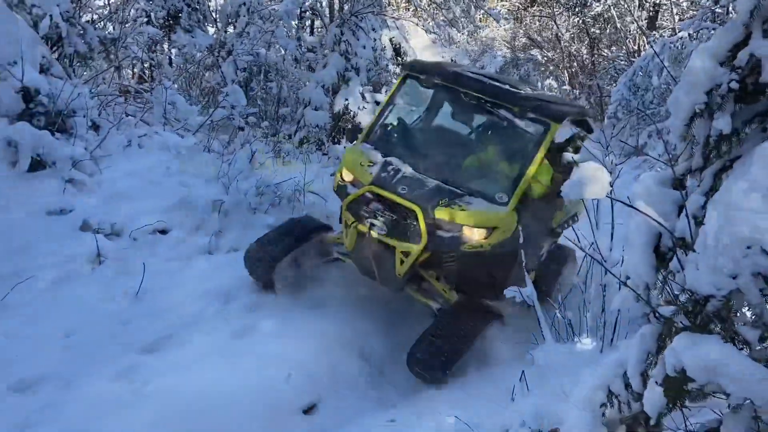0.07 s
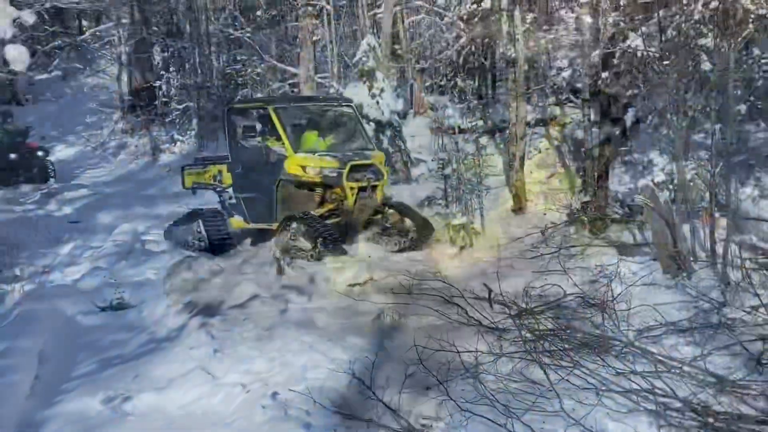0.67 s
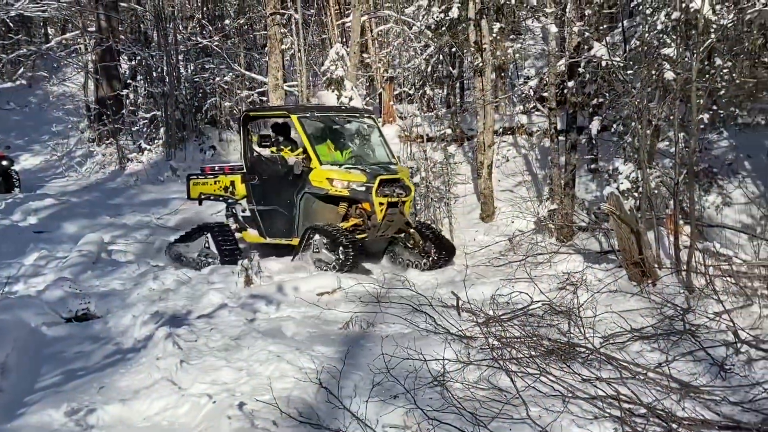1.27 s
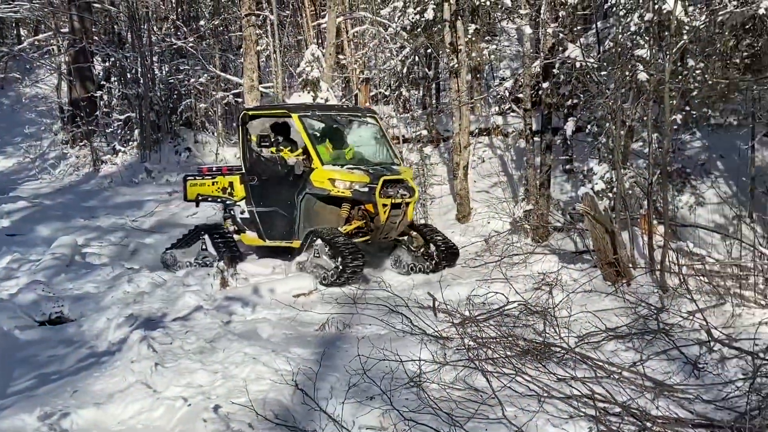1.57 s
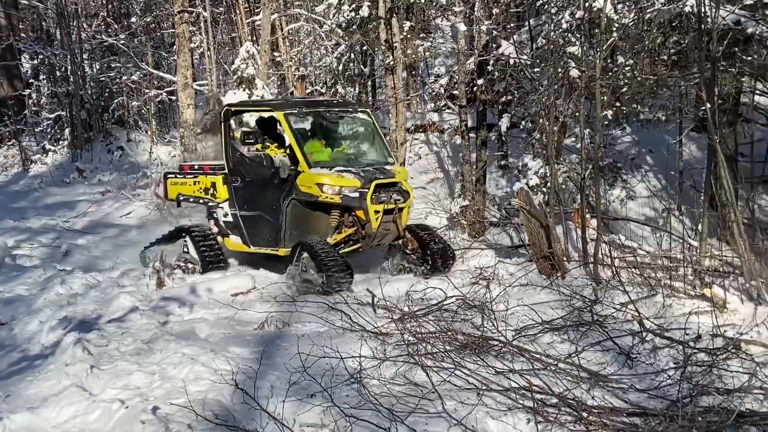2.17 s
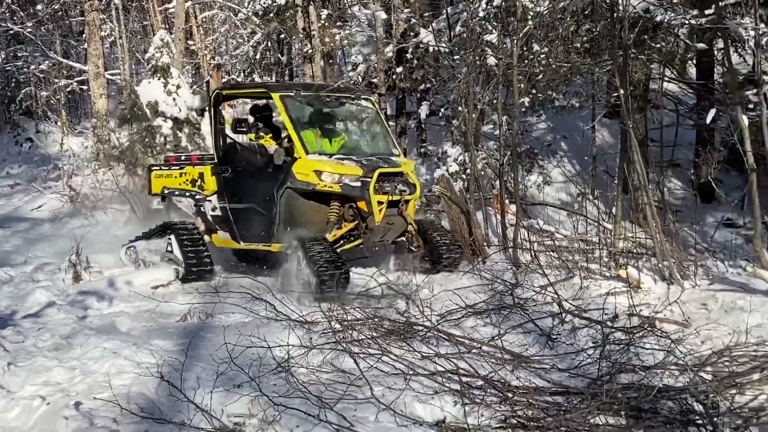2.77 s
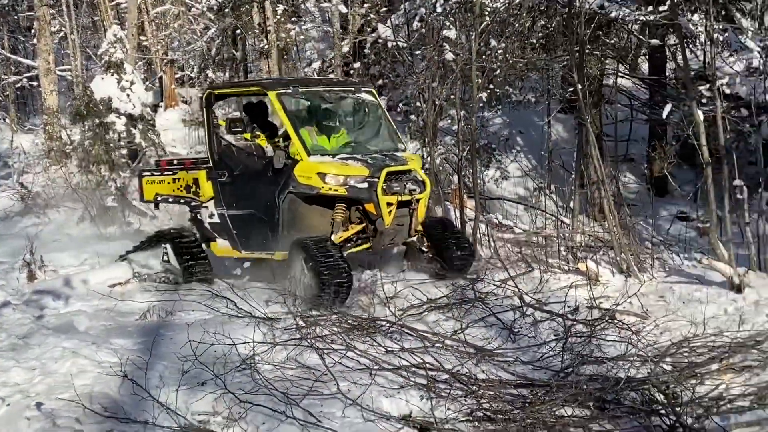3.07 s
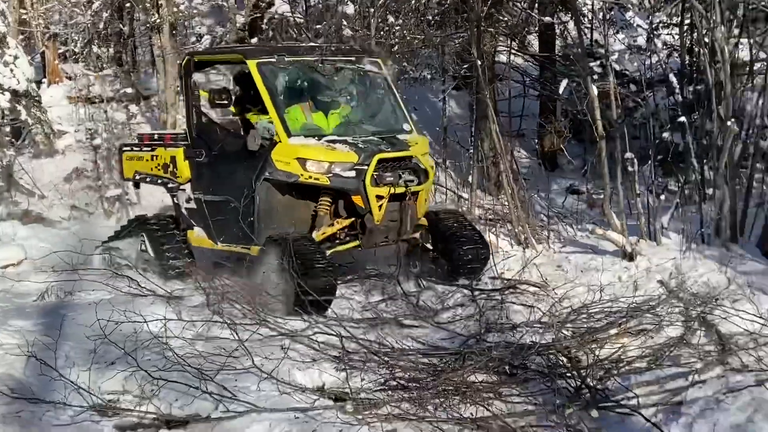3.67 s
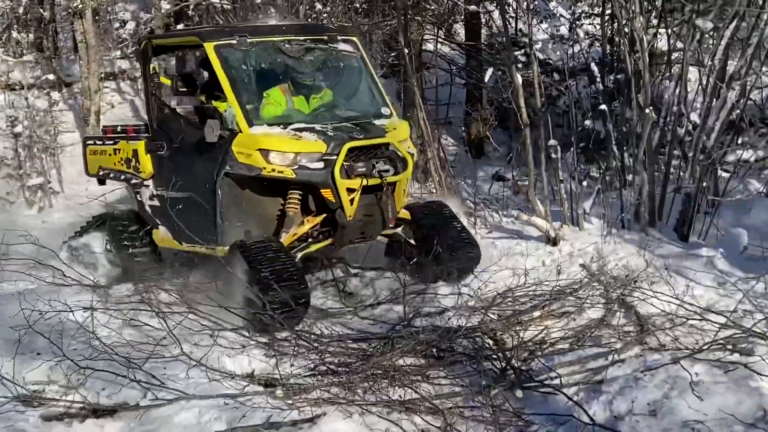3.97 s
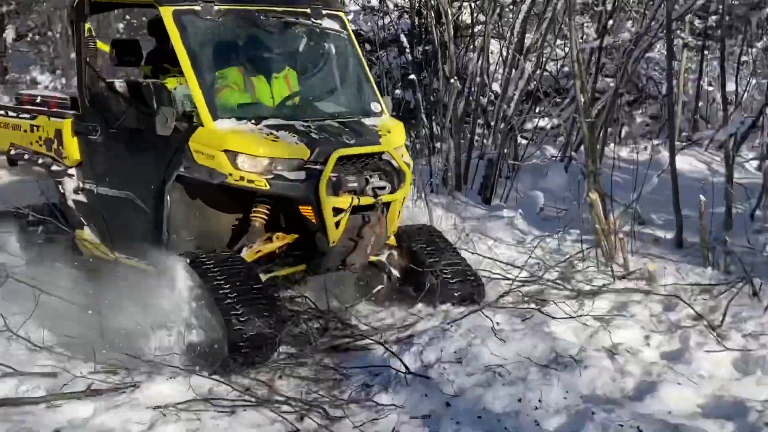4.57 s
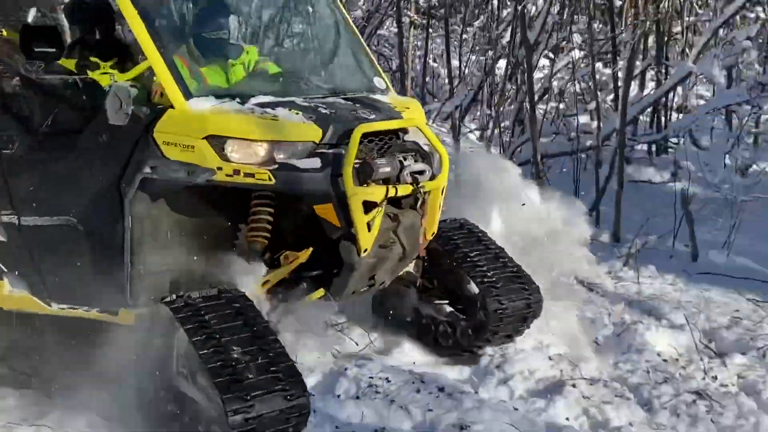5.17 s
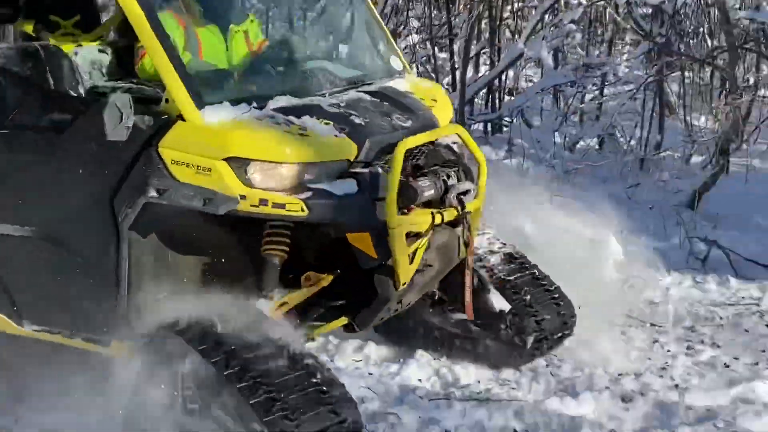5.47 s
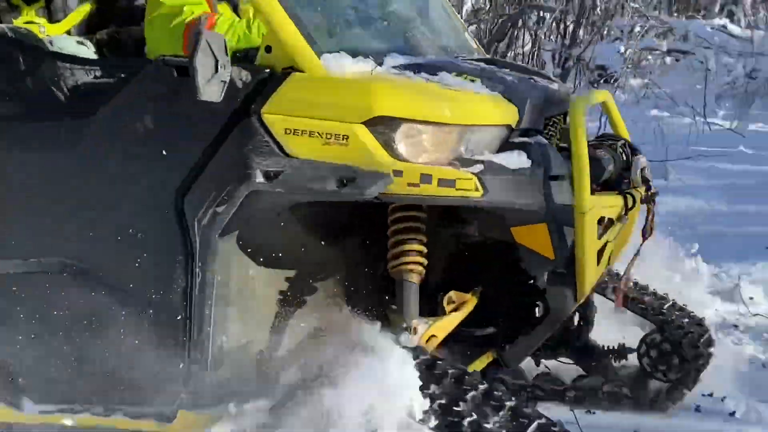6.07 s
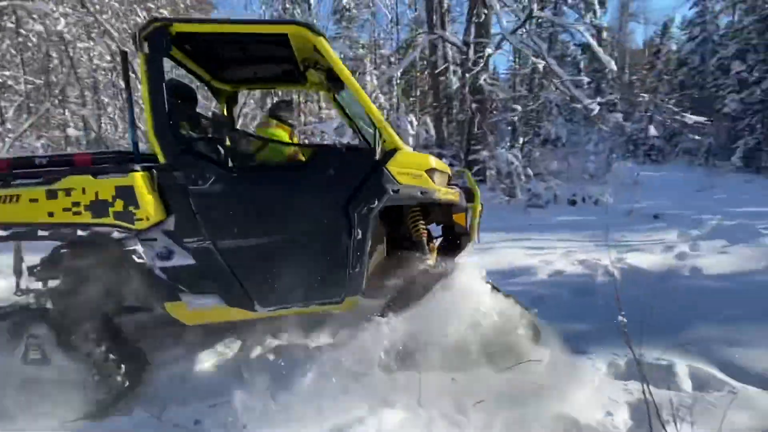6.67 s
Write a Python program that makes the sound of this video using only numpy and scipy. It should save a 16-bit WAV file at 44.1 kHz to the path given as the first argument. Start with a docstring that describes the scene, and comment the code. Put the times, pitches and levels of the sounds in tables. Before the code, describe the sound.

A loud off-road engine revs up, nears and runs close by, with rumbling rubber tracks, crunching snow and cracking branches.

```python
"""A utility vehicle on rubber tracks drives through a snowy forest. It opens at steady revs: the V-twin
booms, growls and barks through the exhaust; tracks rumble, cleats clatter, snow crunches.
From 1 s it approaches and speeds up, and frozen branches snap under it, most densely at 3.5-5 s.
From 5 s it runs close alongside, knocking over bumps and flinging frozen lumps at its panels.
The revs fall; at 6.35 s the sound cuts abruptly to a wider, more echoing shot."""
import sys
import numpy as np
from scipy import signal
from scipy.fft import rfft, irfft
from scipy.io import wavfile
from scipy.ndimage import uniform_filter1d

SR = 44100
rng = np.random.default_rng(int(sys.argv[2]) if len(sys.argv) > 2 else 0)


def log_audio(samples):
    """Write samples as a 16-bit WAV file to the path given in sys.argv[1]."""
    # one column per channel
    frames = np.atleast_2d(samples).T
    # limit to full scale, then quantise
    limited = np.clip(frames, -1, 1)
    pcm = np.round(limited * 32767).astype(np.int16)
    wavfile.write(sys.argv[1], SR, pcm)


N = 300762
TIME = np.arange(N) / SR

# four-stroke cycle rate: time_s, cycle_hz
REVS = [(.5,27),(1.15,29.7),(1.35,29.1),(1.88,31.4),(2.0,34.1),(2.33,39.2),(2.73,39.2),(2.89,40.8),(3.2,40.1),(3.4,40.7),(3.63,40.5),(4.09,45.6),(4.26,45.6),(4.4,44.4),(4.5,45.2),(4.8,46.3),(5.06,48.4),(5.4,42),(5.62,46),(5.8,45.8),(5.94,42.6),(6.36,35.6),(6.82,31.3)]
# drive-by path: time_s, distance_m
PATH = [(.9,33.4),(1.8,23),(2.5,11.8),(3.2,9.8),(4.0,6.2),(5.2,5.2),(6.15,3.5),(6.45,4.16),(6.82,4.5)]
# aspect of the vehicle: time_s, nearness (0 far, 0.5 head-on, 1 alongside)
ASPECT = [(0,1),(.5,1),(.85,0),(3.7,0),(4.1,.5),(4.8,.5),(5.4,1)]
# boom overtones: cycle_multiple, far_db, head_on_db, alongside_db, after_cut_db
BOOM_ORDERS = [(3,-9,-17.5,-5.5,-21),(4,-4.5,-4.5,-6.5,-4.5),(5,-32,-15,-13,-22),(6,-43,-15.5,-12,-8)]
# brief swells and dips of the boom: centre_s, half_length_s, gain_db
BOOM_SURGES = [(1.88,0.022,-8),(1.98,0.073,5.5),(2.292,.07,2.5),(2.417,0.026,-4),(2.786,0.034,1),(3.398,0.036,-5),(3.67,.035,-13),(3.878,0.041,0.5),(4.404,0.031,-1),(4.803,0.5,-5),(5.28,0.045,-6),(6.043,0.031,-12),(6.13,0.03,4.5),(6.334,0.064,9)]
# engine block orders: cycle_multiple, far_db, head_on_db, alongside_db, after_cut_db
GROWL_ORDERS = [(7,-22,-22,-21,-14),(8,-6,-7.5,-3,-15),(9,-14,-11.5,-8,-17),(10,-5.5,-15.5,-6.5,-14),(11,-7.5,-11,-6,-7.5),(12,-11,-17,-11,-8),(13,-11,-9,-11,-11),(14,-6.5,-11,-10.5,-6),(15,-19,-16,-16,-12),(16,-11,-10,-13,-13),(17,-6,-12,-12,-9),(18,-11.5,-7.5,-13,-8),(19,-11,-19,-17,-11),(20,-8,-19,-16,-13),(21,-15,-20,-18,-20),(27,-17,-19,-20,-24),(30,-20,-19,-16,-24),(36,-23,-17,-17,-24)]
# airbox resonances: pitch_hz, width_hz, gain_db
AIRBOX_MODES = [(447,60,7.5),(745,30,5),(815,45,6)]
# exhaust resonances: pitch_hz, width_hz, far_db, head_on_db, alongside_db
PIPE_MODES = [(232,61,-26,13,-18),(350,61,-3,-10,-5),(431,18,3,-9,4.5),(580,410,-18,-3,-30),(700,170,-11.5,-19,-17),(758,68,-3,-27,-4.5),(816,48,2,3.5,1),(1020,510,-10,-5,-35),(1600,64,-3.5,12,-6)]
# belt shake: frequency_hz, density_db
SHAKE_SPECTRUM = [(25,-28),(40,-19),(58,2),(100,-8.5),(140,-11),(220,-44),(500,-64)]
# frame rumble: frequency_hz, density_db
RUMBLE_SPECTRUM = [(60,-8),(130,3),(240,-3.5),(450,-6.5),(800,-11),(1200,-15.5),(2500,-26)]
# cleat clatter: frequency_hz, density_db
CLATTER_SPECTRUM = [(300,-1),(600,-2),(1000,2.5),(1600,-2.5),(2200,-7.5),(4000,-12),(9000,-50)]
# snow crunch: frequency_hz, density_db
SNOW_SPECTRUM = [(700,13),(1500,-18),(2600,4),(4000,0),(6000,1.5),(8500,-3.5),(12000,1.5),(14000,-4.5),(16000,-48)]
# drops into ruts: start_s, length_s, rumble_gain_db
RUT_DROPS = [(3.493,0.049,-1),(4.22,0.086,6),(4.53,0.056,7.5),(5.093,0.042,7),(5.144,0.11,4.5),(5.302,0.032,11),(6.085,0.016,6)]
# crushed heaps of brush or crust: start_s, length_s, crunch_gain_db, clatter_gain_db
HEAPS = [(0.638,0.1,3.5,5),(0.95,0.027,5,2),(2.983,0.25,2.5,1.5),(3.443,0.16,3.5,2),(3.725,0.062,6.5,5.5),(4.159,0.26,5,3.5),(4.414,0.15,8.5,4),(4.54,0.022,6,8),(4.648,0.063,6.5,-7),(4.742,0.054,5.5,-4),(4.868,0.043,7.5,4),(5.011,0.044,10,-2),(5.037,0.013,7,8),(5.135,0.033,6,1),(5.31,0.016,6.5,-3),(6.15,0.084,2,-1.5),(6.557,0.22,3,0)]
# brushwood under the tracks: time_s, twig_gain_db
BRUSHWOOD = [(.55,-6),(1.0,-17.5),(2.2,-30.5),(3.0,-5.5),(5.1,-6.5),(5.5,-14),(6.32,-12.5),(6.38,-13),(6.7,-18.5)]
# breaking branches: start_s, peak_db, pitch_hz, tearing_db
BRANCH_SNAPS = [(0.96, -20, 2150, 12), (1.072, -21, 4500, -4), (1.3246, -21, 11200, -8),
                (1.437, -17.5, 6550, -19), (1.6694, -25, 4160, 5), (2.515, -16, 3020, 9),
                (2.556, -18.5, 2800, 0), (2.704, -15, 2660, -16), (2.765, -18, 2630, -10),
                (3.005, -7, 5100, -15), (3.1012, -8.5, 6950, -4), (3.46, -6, 2280, 13),
                (3.491, -5.5, 3680, -20), (3.5328, -13, 3540, -21), (3.626, -10, 6500, -21),
                (3.643, -3.5, 11800, -22), (3.65, -14, 11000, -23), (3.766, -3.5, 3770, -28),
                (3.777, -10, 5000, -10), (3.786, -18, 2400, -10), (3.799, -23, 4450, -14),
                (3.8743, -6, 3960, -12), (4.121, -8.5, 10400, -18), (4.165, -4.5, 6200, -7),
                (4.1752, -4.5, 6640, -12), (4.1802, -2.5, 5700, -16), (4.1977, -6.5, 7050, -19),
                (4.2664, -10, 10900, -20), (4.286, -8, 3220, -22), (4.3547, -10, 10800, -4),
                (4.4532, -14, 4780, -10), (4.4718, -12, 5260, -18), (4.537, -14, 4240, -20),
                (4.5012, -7, 5570, -10), (4.5711, -1.5, 2800, -18), (4.5757, -13, 2140, -14),
                (4.6806, -9, 6000, -5), (4.842, -8, 6650, -13), (4.8964, -10.5, 4670, -11),
                (5.001, -8.5, 11900, 0), (5.037, -1, 12000, -18), (5.065, -5.5, 2540, -6),
                (5.157, -6.5, 6060, -10), (5.577, -7, 11600, -12), (5.888, -13, 3200, 16),
                (6.155, -12, 5840, 1), (6.228, -15.5, 2480, 1), (6.42, -6, 11900, -28)]
# dragged branches: start_s, length_s, from_hz, to_hz, level_db
BRANCH_SCRAPES = [(0.652,0.1,515,1980,-34),(5.885,0.04,3060,4360,-27)]
# suspension knocks: start_s, level_db
BUMPS = [(.954,-17),(.963,-14),(3.495,-6),(3.765,-13),(4.559,-3),(5.068,-6),(5.162,-2),(5.335,-8),(6.113,1.5)]
# chassis modes: pitch_hz, level_db, t60_s
CHASSIS_MODES = [(125,-12,.09),(230,-7,.08),(450,-2,.05),(560,-2,.05),(660,-1,.05),(960,-4,.04),(1350,-7,.03)]
# track slaps: start_s, level_db, pitch_hz, t60_s
TRACK_SLAPS = [(5.07,-7,186,0.18),(5.131,-5.5,114,0.23),(5.178,-10,113.5,0.22),(5.33,-9,297,0.18),(5.615,-24,477,0.054),(5.645,-18,127,0.11),(6.111,-5,149,0.085)]
# frozen lumps on the panels: start_s, peak_db, pitch_hz
LUMP_HITS = [(4.899,-15,1200),(5.203,-22,1700),(5.2448,-14.5,1670),(5.3282,-18,1240),(5.341,-18,1350),(5.399,-20,2200),(5.5181,-23,1230),(5.551,-15,2400),(5.672,-17.5,2590),(5.7341,-15.5,1380),(5.76,-21,1500),(5.7925,-23,1650),(5.8334,-21,2500),(5.959,-14,1550),(6.001,-21,1240),(6.022,-18.5,1600),(6.228,-19,1270),(6.5456,-21,1630)]
# left-right correlation of track noise: frequency_hz, opening, approaching, after_cut
CORRELATION = [(60,0.51,0.99,0.97),(250,0.97,0.99,0.85),(700,0.57,0.9,0.65),(1540,0.84,0.98,0.1),(2240,0.77,1,0.45),(5000,0.58,1,0.12),(11900,1,0.98,0.63)]
# phase between the microphone ports: frequency_hz, left_lead_rad
PORT_PHASE = [(20,0),(600,.08),(1550,.5),(2100,0),(7500,0),(8600,-3.1),(9400,-3.2),(10400,-6.28),(11700,-6.28),(12900,-9.4),(13750,-9.45),(14600,-12.57),(16400,-12.57)]

# level laws: opening_db, close_db, loss_db_per_doubling, rev_db_per_hz, after_cut_db
BOOM = (-15, -22, 0.96, 0.12, -2)
LOPE = (-28, -25, 5.5, 0.57, -5)
OVERTONES = (-24.5, -25, 2, 0.08, 0.5)
BARK = (-40, -27, 4.5, -0.62, 1)
BLOCK = (-30.5, -23.8, 4.2, 0.25, -2)
BELTS = (-27, -23.5, 4, -0.02, -5)
FRAME = (-32, -27.5, 6.5, 0, -1.5)
CLEATS = (-33, -31, 3.5, 0.04, -5.5)
CRUNCH = (-38.5, -33.5, 3, 0.04, -0.5)

CRUISE_HZ, FADE_S, CUT_S = 39.6, (0.0074, 0.87), 6.35
SILENCER_HZ, SILENCER_WIDTH_HZ, SILENCER_BOOM_DB, SILENCER_OVERTONE_DB = 76.55, 9.1, 4, -10.5


def engine(cycle_hz, near):
    """One crankshaft drives all voices. Returns the cycle count and [boom, growl + bark]."""
    cycles = np.cumsum(cycle_hz * (1 + .0015 * drift(10))) / SR
    return cycles, np.array([boom(cycles, cycle_hz), growl(cycles, cycle_hz, near) + bark(cycles)])


def boom(cycles, cycle_hz, lift_width_hz=36):
    """Low orders leave the tailpipe as tones; silencer resonance swells the boom and cuts overtones."""
    firing_hz = 2 * curve(REVS)
    in_tune = bell(firing_hz, SILENCER_HZ, SILENCER_WIDTH_HZ)
    surge_db = sum(db * np.exp(-((TIME - centre_s) / half_s) ** 2)
                   for centre_s, half_s, db in BOOM_SURGES)
    boom_db = loudness_db(BOOM) + SILENCER_BOOM_DB * in_tune + surge_db
    overtone_db = loudness_db(OVERTONES) + SILENCER_OVERTONE_DB * in_tune
    out = from_db(boom_db + drift(21)) * np.sin(4 * np.pi * cycles)
    out += from_db(loudness_db(LOPE) - 1 + 0.5 * drift(21)) * np.sin(2 * np.pi * cycles)
    for multiple, *aspect_db in BOOM_ORDERS:
        lift_db = SILENCER_BOOM_DB * bell(multiple * cycle_hz, SILENCER_HZ, lift_width_hz)
        level_db = overtone_db + by_aspect(curve(ASPECT), aspect_db) + lift_db + 2.7 * drift(8.5)
        out += from_db(level_db) * np.sin(2 * np.pi * multiple * cycles)
    return np.sqrt(2) * out


def growl(cycles, cycle_hz, near, flutter_db=2.4, shudder_rad=.25):
    """The block's middle orders flutter, and swell under load and at the airbox resonances."""
    slack_db = .3 * np.minimum(cycle_hz - CRUISE_HZ, 0) * (1 - near)
    out = 0
    for multiple, *aspect_db in GROWL_ORDERS:
        airbox_db = sum(db * bell(multiple * cycle_hz, hz, width_hz) for hz, width_hz, db in AIRBOX_MODES)
        level_db = by_aspect(near, aspect_db) + slack_db * multiple / 20
        level_db += airbox_db * (1 - .55 * near ** 2)
        wander_rad = .6 * drift(.8) + shudder_rad * (1 + near ** 2 / 2) * drift(30)
        phase_rad = 2 * np.pi * multiple * cycles + wander_rad - .05 * multiple ** 2
        out += from_db(level_db + flutter_db * drift(8.2)) * np.sin(phase_rad)
    return from_db(loudness_db(BLOCK) - 5.5) * np.sqrt(2) * out


def bark(cycles, second_db=-7, second_cycles=.53, uneven_db=5, jitter_s=.00006, echo_s=0.008785):
    """Two unevenly spaced firings a cycle, each with a puff of gas noise, ring the exhaust pipe."""
    pulses, puffs = np.zeros((2, N))
    for offset, level_db in [(0, 0), (second_cycles, second_db)]:
        at = np.interp(np.arange(1, int(cycles[-1]) - 1) + offset, cycles, np.arange(N))
        timing, strength = rng.standard_normal((len(at), 2)).T
        at = np.clip(at + jitter_s * SR * timing, 0, N - 1).astype(int)
        pulses[at] += from_db(level_db + uneven_db * strength)
        puffs += from_db(level_db) * np.exp(-((cycles - offset) % 1) / 0.21)
    drive = rms_one(pulses) + .18 * rms_one(puffs * rng.standard_normal(N))
    drive += 0.51 * np.roll(drive, int(echo_s * SR))  # reflection off the pipe end
    pipe = 0
    for k, (hz, width_hz, *aspect_db) in enumerate(PIPE_MODES):
        gain = from_db(np.interp(curve(ASPECT), [0, .5, 1], aspect_db))
        pipe += (-1) ** k * gain * resonance(drive, hz, width_hz)
    running_rms = np.sqrt(uniform_filter1d(pipe ** 2, SR // 5) + 1e-12)
    return from_db(loudness_db(BARK) - 9.5) * pipe / running_rms


def tracks(cycles):
    """Belts shake the chassis, the frame rumbles, cleats clatter over the wheels, snow gives way."""
    crush_db, rattle_db = heap_gains_db()
    rut_db = sum(db * swell(start_s, length_s) for start_s, length_s, db in RUT_DROPS)
    shake = coloured(rng.standard_normal((2, N)), SHAKE_SPECTRUM, flicker_db=-0.5)
    rumble = coloured(grains(2500, 3.83), RUMBLE_SPECTRUM, flicker_db=3)
    clatter = coloured(grains(4000, 2.06), CLATTER_SPECTRUM, flicker_db=2)
    throb = 1 + .3 * curve(ASPECT) * np.cos(2 * np.pi * cycles - 1.2)  # once per engine cycle
    return (from_db(loudness_db(BELTS) + 0.8) * shake
            + from_db(loudness_db(FRAME) + rut_db + 3) * rumble
            + from_db(loudness_db(CLEATS) + rattle_db + 1.5) * throb * clatter
            + snow_crunch(crush_db))


def snow_crunch(crush_db, treble_hz=6300):
    """Snow collapses in clumps of grains; without brushwood it is soft and loses its treble."""
    clumps = from_db(4.2 * np.minimum(drift(24), 1.5))
    crushed = 0.55 * clumps * grains(1300, 2.16) + 0.95 * rng.standard_normal((2, N))
    crunch = coloured(crushed, SNOW_SPECTRUM, flicker_db=1.5)
    crunch *= from_db(loudness_db(CRUNCH) + crush_db + 3)
    hz = np.fft.rfftfreq(N, 1 / SR)
    treble = irfft(rfft(crunch) * (1 - 1 / (1 + (hz / treble_hz) ** 8)), N)
    treble_db = 0.39 * (curve(BRUSHWOOD) + 10)
    return crunch + treble * (from_db(treble_db) - 1)


def snaps(crack_cycles=2.2, splinter_s=0.0081, broad_db=-6):
    """A branch breaks with one sharp crack, shorter for thinner wood; then fibres tear."""
    out, t = np.zeros(N + SR), np.arange(SR // 10) / SR
    for start_s, peak_db, hz, tearing_db in BRANCH_SNAPS:
        noise, fibres = rng.standard_normal((2, len(t)))
        age = t * hz / crack_cycles
        split = age * np.exp(1 - age)
        tearing = from_db(tearing_db) * rms_one(fibres ** 3) * np.exp(-t / splinter_s)
        burst = split * np.sign(noise) + tearing
        crack = band(burst, hz / 1.56, hz * 1.62, order=1)
        crack += from_db(broad_db) * band(burst, max(2200, hz / 2), 11500)
        crack += 0.64 * split * np.sin(2 * np.pi * hz * t)  # the broken ends ring
        add_hit(out, crack, start_s, peak_db)
    return out[:N]


def knocks(rattle_db=-9, rattle_s=.009, far_bass_db=-14):
    """The suspension hits the frame, which rings and rattles; from afar its low modes are lost."""
    out, t = np.zeros(N + SR), np.arange(SR // 5) / SR
    for start_s, level_db in BUMPS:
        bass_db = far_bass_db * (1 - np.interp(start_s, *np.transpose(ASPECT)))
        ring = 0
        for k, (hz, db, t60_s) in enumerate(CHASSIS_MODES):
            mode_db = db + bass_db * (hz < 300) + rng.normal(0, 2.2)
            ring += (-1) ** k * from_db(mode_db - 60 * t / t60_s) * np.sin(2 * np.pi * hz * t)
        rattle = rms_one(band(rng.standard_normal(len(t)), 330, 1700)) * np.exp(-t / rattle_s)
        add_hit(out, ring + from_db(rattle_db) * rattle, start_s, level_db - 8.5)
    return out[:N]


def slaps(rise_s=0.019):
    """A track slaps into a hollow with a short, low boom."""
    out = np.zeros(N)
    for start_s, level_db, hz, t60_s in TRACK_SLAPS:
        age_s = np.maximum(TIME - start_s, 0)
        envelope = from_db(level_db - 60 * age_s / t60_s) * (1 - np.exp(-age_s / rise_s))
        out += envelope * np.sin(2 * np.pi * hz * age_s)
    return out


def lumps(clack_s=0.004, crumble_s=0.0069, crumble_db=-5):
    """A frozen lump flung off the track clacks against a panel and crumbles."""
    out, t = np.zeros(N + SR), np.arange(SR // 20) / SR
    for start_s, peak_db, hz in LUMP_HITS:
        contact, crumbs = rng.standard_normal((2, len(t)))
        clack = rms_one(resonance(contact, hz, hz / 2)) * np.exp(-t / clack_s)
        crumble = rms_one(band(crumbs * np.abs(crumbs), 2100, 6400)) * np.exp(-t / crumble_s)
        add_hit(out, clack + from_db(crumble_db) * crumble, start_s, peak_db)
    return out[:N]


def twigs(sizes=16, q=8):
    """Twigs crackle under the cleats, each size ringing at its own pitch."""
    clicks = grains(per_s=190, spread_db=1.5)[0]
    size = rng.integers(0, sizes, N)
    pitches_hz = np.geomspace(1700, 8000, sizes) * rng.uniform(0.955, 1.04, sizes)
    rings = sum(resonance(clicks * (size == k), hz, hz / q) / np.sqrt(hz)
                for k, hz in enumerate(pitches_hz))
    return from_db(loudness_db(CRUNCH) + heap_gains_db()[0] + curve(BRUSHWOOD)) * rms_one(rings)


def scrapes(waver=0.054):
    """Wood rubs on rubber; the rough pitch rises as the branch bends."""
    out = np.zeros(N)
    for start_s, length_s, from_hz, to_hz, level_db in BRANCH_SCRAPES:
        progress = np.clip((TIME - start_s) / length_s, 0, 1)
        hz = from_hz * (to_hz / from_hz) ** progress * (1 + waver * drift(250))
        envelope = from_db(level_db) * np.sin(np.pi * progress) * drift(180)
        out += envelope * np.sin(2 * np.pi * np.cumsum(hz) / SR)
    return out


def forest(x, t60_s=0.38, trunks=60):
    """Scattered, dull echoes off the trunks, different for each ear."""
    out = np.zeros((2, N))
    for ear in out:
        for delay_s, size in zip(rng.uniform(0.00829, 0.37, trunks), rng.normal(0, 1, trunks)):
            lag = int(delay_s * SR)
            ear[lag:] += size * from_db(-60 * delay_s / t60_s) * x[:N - lag]
    return band(out, 190, 7000, order=1) / np.sqrt(trunks)


def loudness_db(law, close_m=4, working_hz=40):
    """Opening level, fading into one set by distance and revs, with a step at the cut."""
    opening_db, close_db, loss_db, rev_db_per_hz, after_cut_db = law
    doublings = np.log2(curve(PATH) / close_m)
    extra_hz = curve(REVS) - working_hz
    driving_db = close_db - loss_db * doublings + rev_db_per_hz * extra_hz + after_cut_db * after_cut()
    return 20 * np.log10(np.hypot((1 - fade()) * from_db(opening_db), fade() * from_db(driving_db)))


def fade():
    """0 in the opening, 1 in the drive-by."""
    return np.interp(TIME, FADE_S, [0, 1])


def after_cut():
    """0 before the cut to the wider shot, 1 after."""
    return np.clip((TIME - CUT_S) / 0.015 + .5, 0, 1)


def by_aspect(near, aspect_db):
    """Blend the far, head-on, alongside and after-cut levels."""
    return np.interp(near + after_cut(), [0, .5, 1, 2], aspect_db)


def from_left(x, lag_s=0.00031):
    """After the cut, the engine is heard slightly from the left, reaching the right ear later."""
    delayed = np.interp(TIME - lag_s, TIME, x)
    return np.array([x, x + after_cut() * (delayed - x)])


def heap_gains_db():
    """What the heap under the tracks adds to crunch and to clatter."""
    return np.max([np.outer(gains_db, swell(start_s, length_s))
                   for start_s, length_s, *gains_db in HEAPS], axis=0)


def swell(start_s, length_s, attack_s=0.037, release_s=0.035):
    """Linear attack, hold, exponential release."""
    age_s = TIME - start_s
    return np.clip(age_s / attack_s, 0, 1) * np.exp(-np.maximum(age_s - length_s, 0) / release_s)


def grains(per_s, spread_db):
    """Two trains of random, uneven clicks; rms 1."""
    sizes = from_db(spread_db * np.minimum(rng.exponential(1, (2, N)), 5))
    return rms_one(sizes * rng.choice([-1, 1], (2, N)) * (rng.random((2, N)) < per_s / SR))


def coloured(drive, spectrum, flicker_db):
    """Shape two excitations into stereo, in flickering half-octave bands; rms 1."""
    out, stage = 0, fade() ** 2 + after_cut()
    edges_hz = 22 * 2 ** (np.arange(21) / 2)
    for k, (low_hz, high_hz) in enumerate(zip(edges_hz, edges_hz[1:])):
        hz = np.sqrt(low_hz * high_hz)
        if spectrum[0][0] < high_hz and low_hz < spectrum[-1][0]:
            mid, side = band(drive, low_hz, high_hz) * (-1) ** k
            alike = np.interp(stage, [0, 1, 2], [at_hz(CORRELATION, hz, column) for column in (1, 2, 3)])
            alike = np.clip(alike, 0, 1)
            gain = from_db(at_hz(spectrum, hz) + flicker_db * drift(15))
            out += gain * (np.sqrt(1 + alike) * mid + np.sqrt(1 - alike) * side * [[1], [-1]])
    return rms_one(out)


def drift(rate_hz):
    """Smooth random wander, rms about 1."""
    pole = np.exp(-80 * np.pi * rate_hz / SR)
    noise = rng.standard_normal(N // 40 + 2002)
    slow = signal.lfilter([1], [1, -2 * pole, pole * pole], noise)[2000:]
    return np.interp(np.arange(N) / 40, np.arange(len(slow)), rms_one(slow))


def band(x, low_hz, high_hz, order=2):
    """Butterworth band-pass."""
    edges_hz = [min(low_hz, .4 * SR), min(high_hz, .46 * SR)]
    return signal.sosfilt(signal.butter(order, edges_hz, "band", fs=SR, output="sos"), x + 1e-18)


def resonance(x, hz, width_hz):
    """Two-pole resonator, peak gain 1."""
    r = np.exp(-np.pi * width_hz / SR)
    feedback = [1, -2 * r * np.cos(2 * np.pi * hz / SR), r * r]
    return signal.lfilter(np.array([1, 0, -1]) * (1 - r * r) / 2, feedback, x + 1e-18)


def bell(hz, centre_hz, width_hz):
    """Resonance curve, 1 at the centre."""
    return 1 / (1 + ((hz - centre_hz) / (width_hz / 2)) ** 2)


def add_hit(out, hit, start_s, peak_db):
    """Mix in a hit at a given peak level."""
    at = int(start_s * SR)
    out[at:at + len(hit)] += from_db(peak_db) * hit / np.abs(hit).max()


def curve(rows):
    """Read a table at every sample."""
    return np.interp(TIME, *np.transpose(rows))


def at_hz(rows, hz, column=1):
    """Read a table on a log-frequency axis."""
    rows = np.array(rows)
    return np.interp(np.log(hz), np.log(rows[:, 0]), rows[:, column])


def from_db(db):
    """Decibels to gain."""
    return 10 ** (np.asarray(db) / 20)


def rms_one(x):
    """Scale to rms 1."""
    return x / np.sqrt(np.mean(x ** 2) + 1e-20)


def scene():
    """Engine, tracks and breaking wood among the trees; after the cut, more echo and slightly left."""
    _, cruising = engine(CRUISE_HZ, near=0)
    cycles, driving = engine(curve(REVS), curve(ASPECT))
    share = fade() ** 4
    bass, mids = np.sqrt(1 - share) * cruising + np.sqrt(share) * driving
    contacts = snaps() + twigs() + scrapes() + knocks() + lumps() + slaps()
    echoes = from_db(-6.5 + 10.7 * after_cut()) * forest(mids)
    balance = from_db(0.69 * after_cut() * np.array([[1], [-1]]))
    return (bass + from_left(mids) + contacts + tracks(cycles) + echoes) * balance


def record(dry, low_cut_hz=33, high_cut_hz=15900, ceiling=.85):
    """The microphone ports part in phase in the treble; then low cut, soft clip, high cut."""
    hz = np.fft.rfftfreq(N, 1 / SR)
    twist = np.exp(.5j * np.interp(hz, *np.transpose(PORT_PHASE)) * np.array([[1], [-1]]))
    heard = irfft(rfft(dry) * twist, N)
    heard = signal.sosfilt(signal.butter(4, low_cut_hz, "high", fs=SR, output="sos"), heard)
    heard = heard / (1 + (heard / ceiling) ** 8) ** (1 / 8)
    return irfft(rfft(heard) / np.sqrt(1 + (hz / high_cut_hz) ** 200), N)


dry = scene()
out = record(dry)
log_audio(out)
```